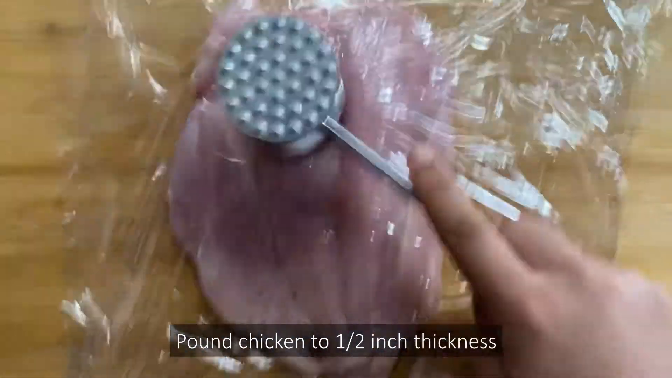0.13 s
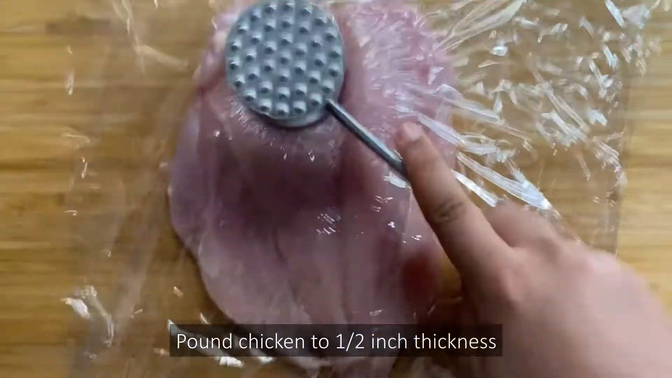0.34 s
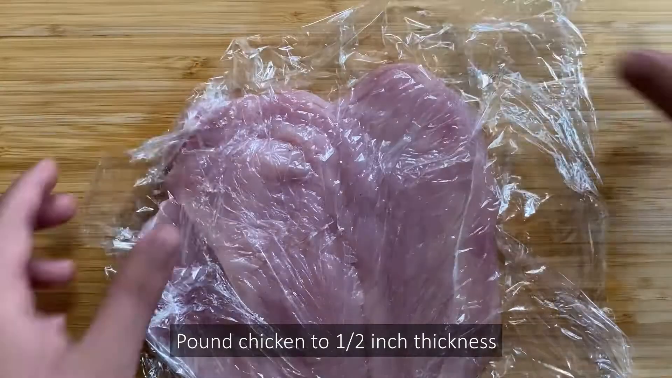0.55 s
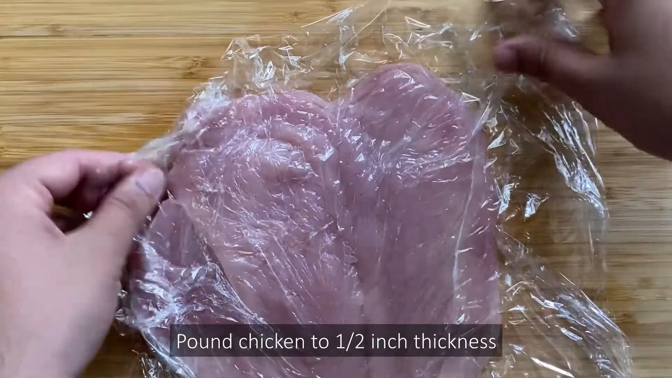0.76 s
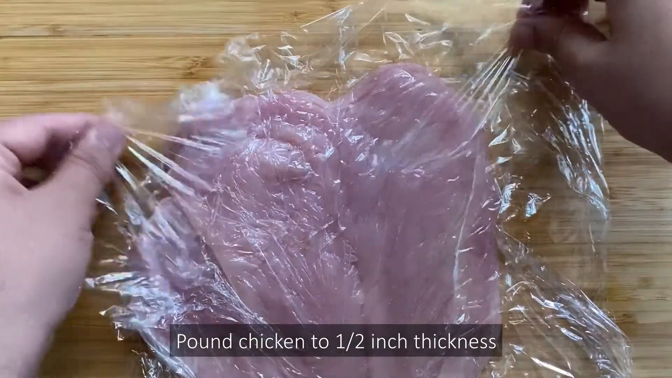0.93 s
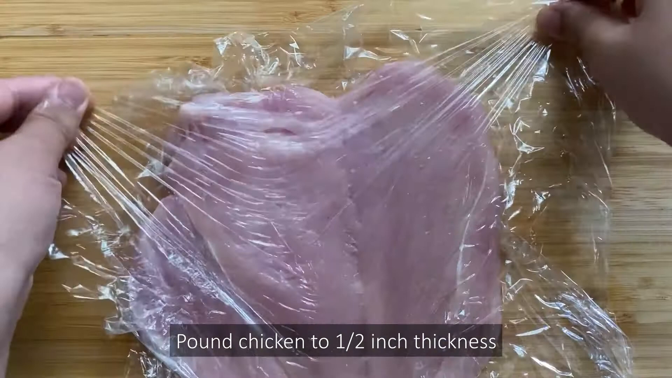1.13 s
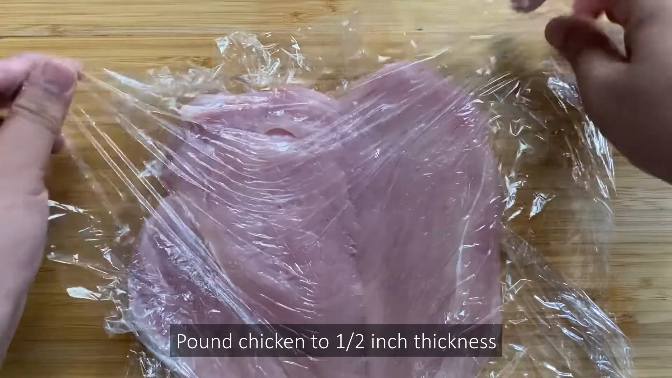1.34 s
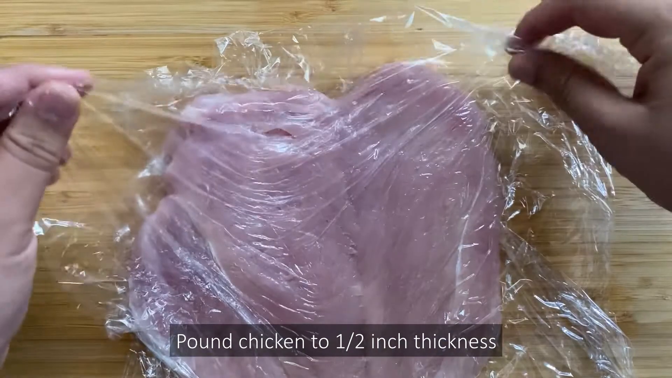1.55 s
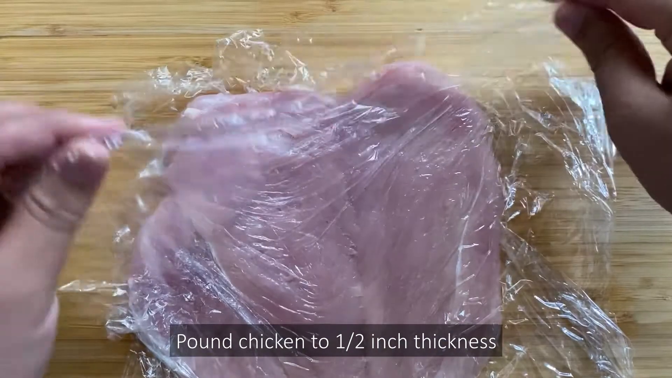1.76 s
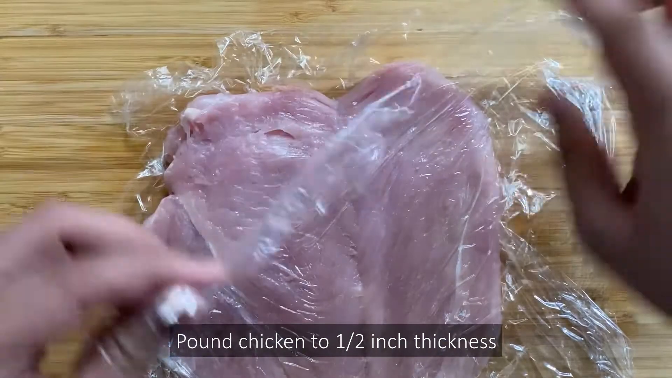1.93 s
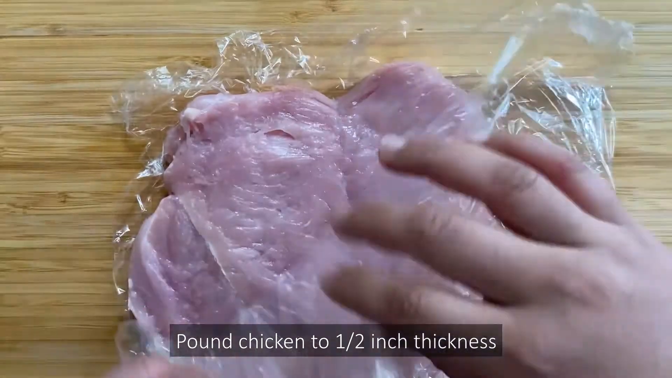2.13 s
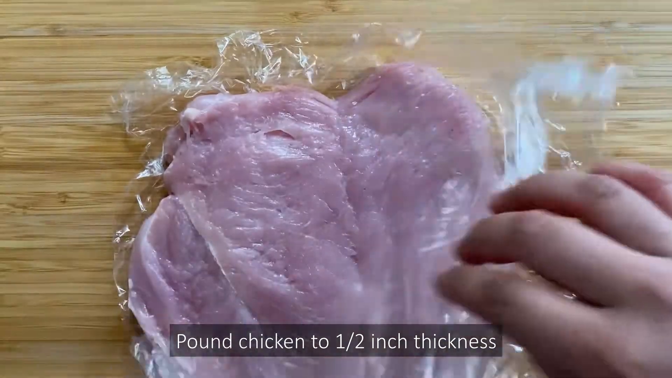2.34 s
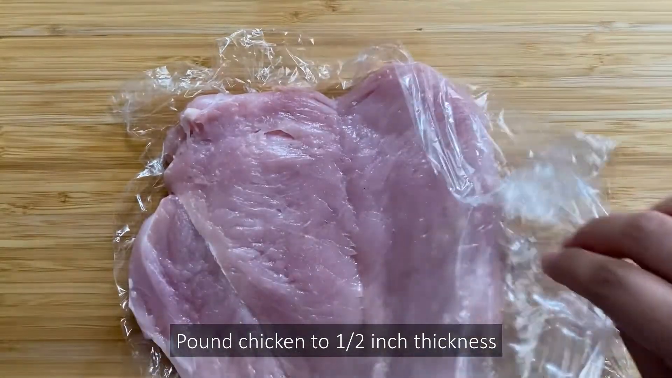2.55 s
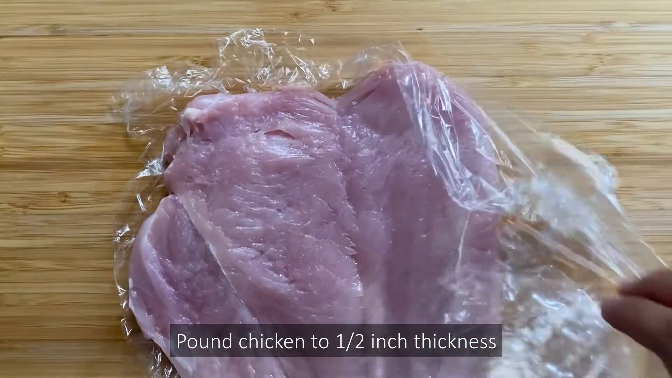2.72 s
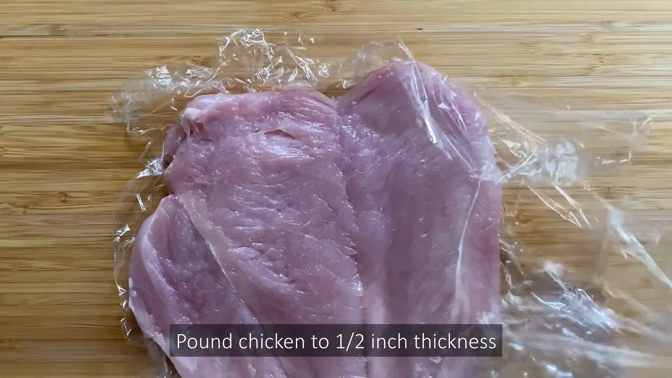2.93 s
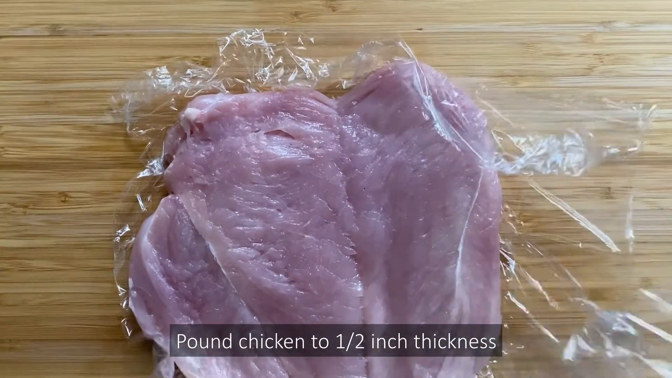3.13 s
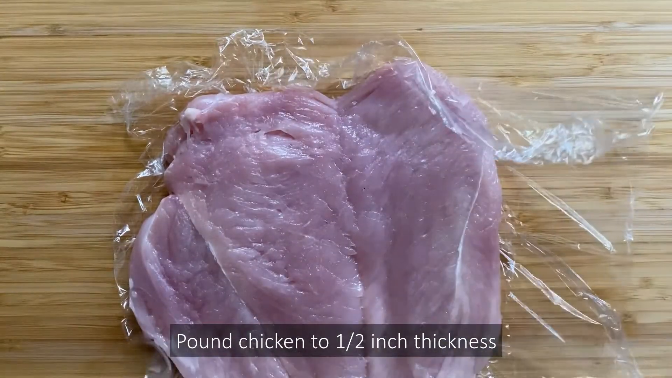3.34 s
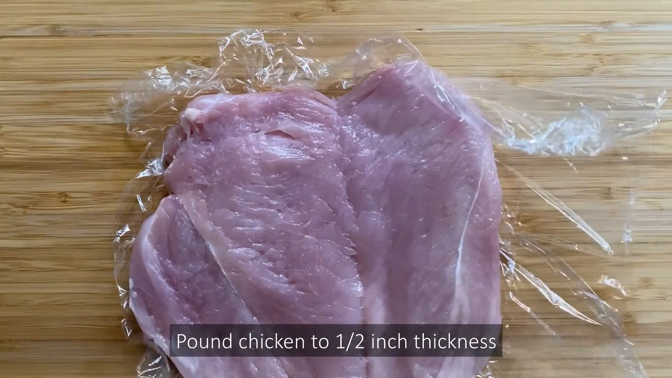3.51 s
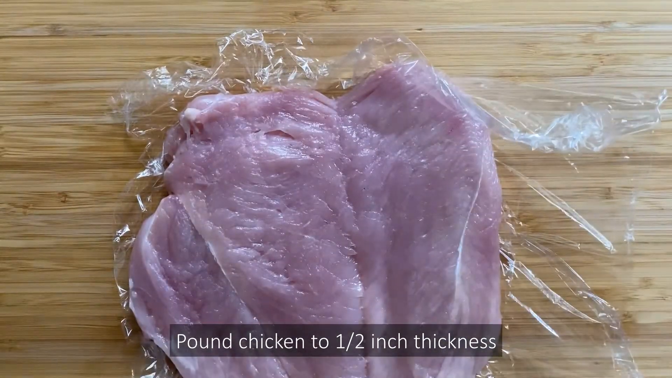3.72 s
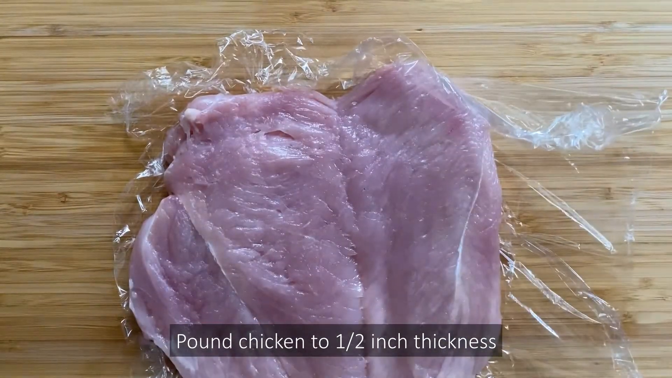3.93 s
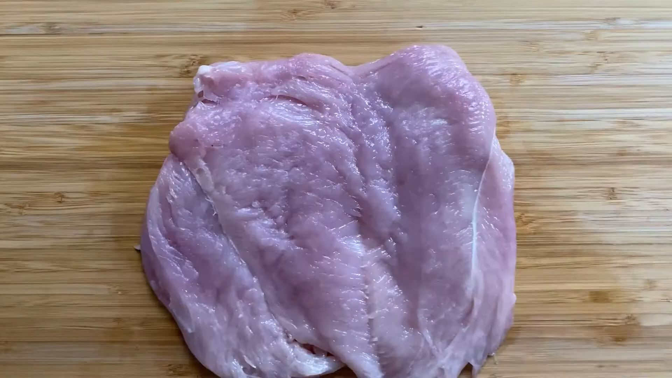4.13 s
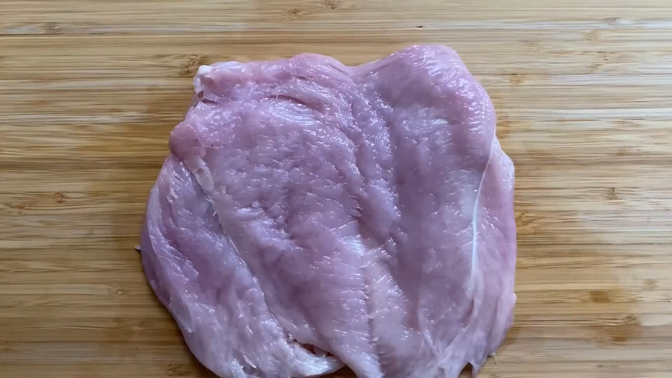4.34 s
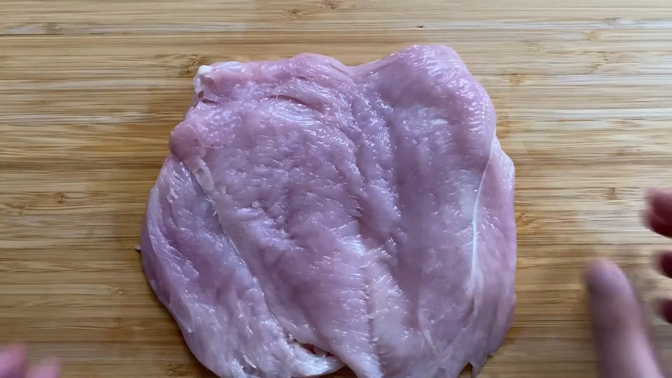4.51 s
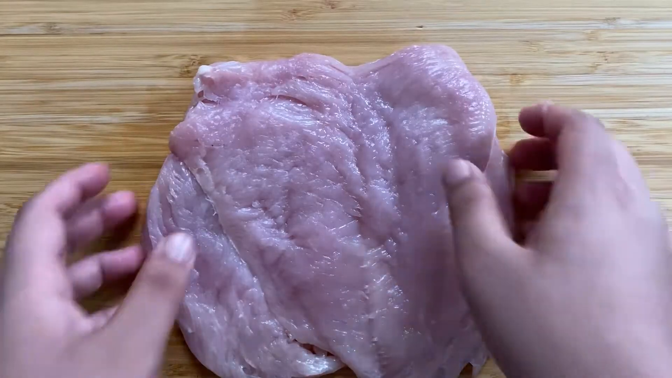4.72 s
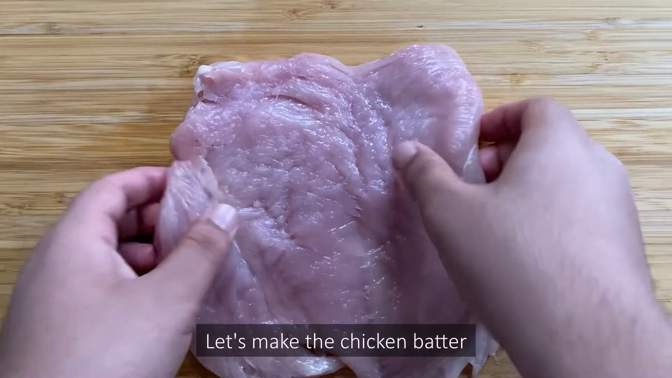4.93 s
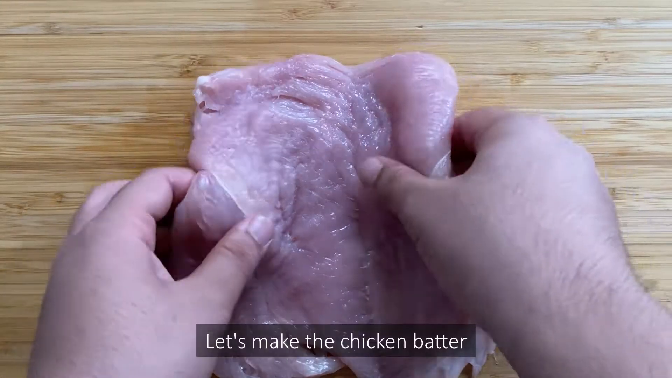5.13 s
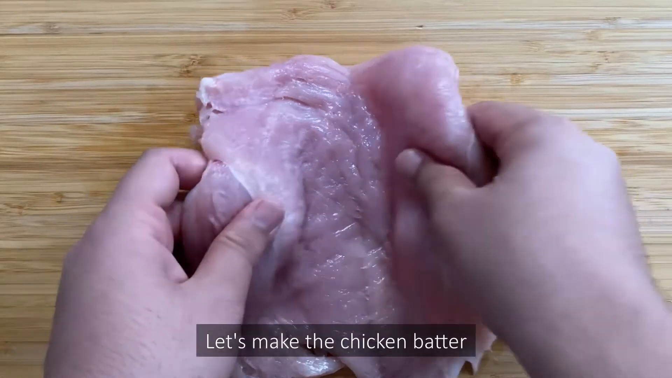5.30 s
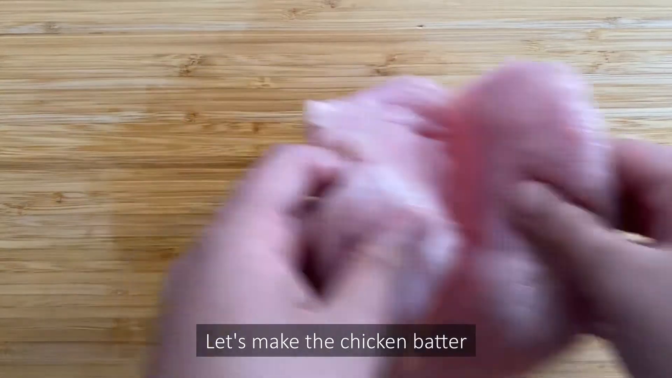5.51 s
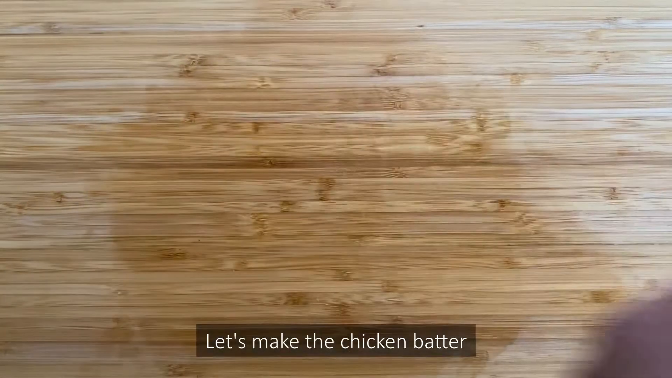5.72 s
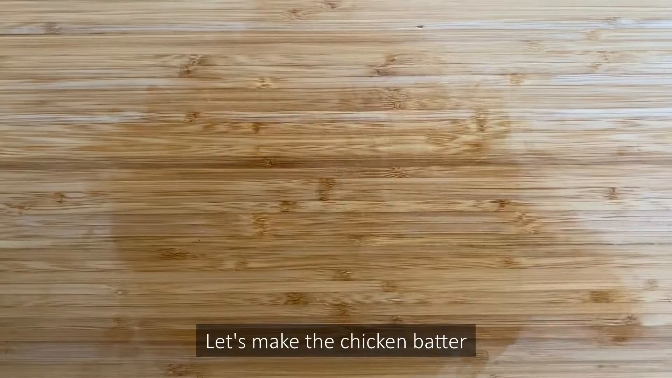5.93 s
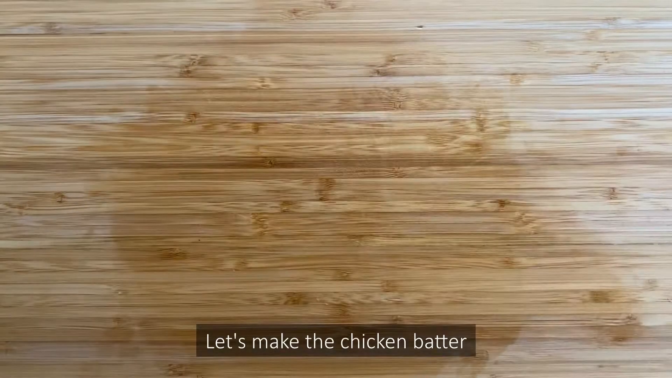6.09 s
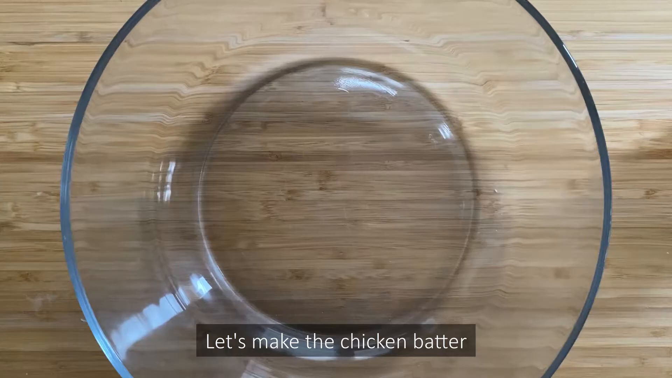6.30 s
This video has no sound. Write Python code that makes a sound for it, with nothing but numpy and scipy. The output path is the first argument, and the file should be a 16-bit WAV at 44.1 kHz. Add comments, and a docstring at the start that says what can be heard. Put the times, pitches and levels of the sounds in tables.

```python
"""Pounding a chicken breast under film

A metal mallet pounds meat under cling film on a wooden board in a kitchen: noisy cracks, damped pops, deep thumps.
Then the film peels off in swarms of random snaps, and hands grip and lift the wet meat with sparse resonant ticks.
The stages follow abruptly, over filtered noise for air and rumble and sines for a hum; a deeper room tone ends it.
"""
import sys
import numpy as np
from scipy import signal
from scipy.fft import rfft, irfft, next_fast_len
from scipy.io import wavfile
from scipy.ndimage import uniform_filter1d

SR = 44100
rng = np.random.default_rng(int(sys.argv[2]) if len(sys.argv) > 2 else 0)


def store_wav(level_fs):
    """Save 16-bit WAV to argv[1]."""
    pcm = np.round(np.clip(np.atleast_2d(level_fs), -1, 1) * 32767)
    wavfile.write(sys.argv[1], SR, pcm.T.astype(np.int16))


N = 284885
TIME = np.arange(N) / SR

POUND_END, PEEL_END, LIFT_END = 0.436, 4.062, 6.269  # abrupt ends of the stages of work [s]
AIR_DB = -72  # level of the room air [dB rms]


def mallet():
    """Impact: each blow superposes a broadband crack, a pop of trapped air and a deep thump."""
    # mallet blows, the first already dying away:
    # (time [s], crack gain [dB], air pop gain [dB], thump gain [dB])
    blows = [(-0.135, -12.5, -19.5, -8.5), (0.1214, -9.5, -32, -6), (0.3771, -6, -3.5, -2.5)]
    out = np.zeros(N)
    t = np.arange(-SR // 100, SR) / SR  # contact at t = 0
    for s, crack_db, pop_db, thump_db in blows:
        blow = from_db(crack_db) * crack(t)
        blow += from_db(pop_db) * air_pop(t)
        blow += from_db(thump_db) * thump(t)
        add(out, s + t[0], blow)
    return out + cling()


def crack(t, touch_s=.0014, fade_s=0.0029, slap_s=.00025, studs_db=-9.0, room_db=9.5):
    """Broadband impact: studs touch as short noise, the face slaps the film, the room answers in the same colour."""
    # spectrum of the studs on the film: (frequency [Hz], relative density [dB per Hz])
    crack_colour = [(120, -0.5), (400, 3.5), (680, -2.5), (2100, -6.5), (2800, -5), (5800, -3), (9500, -2),
                    (16000, -5)]
    studs = from_db(studs_db) * (t > -touch_s) * np.exp(-np.maximum(t, 0) / fade_s)
    slap = np.exp(-(t / slap_s) ** 2)
    grit = colour(rng.choice([-1., 1.], len(t)), crack_colour)
    answer = np.pad(echoes(), (len(t) - SR, 0))  # begins at contact
    tail = colour(answer, crack_colour) / np.sqrt(len(t))  # unit energy
    return grit * (studs + slap) + from_db(room_db) * tail


def air_pop(t):
    """Cavity resonance: air squeezed from under the mallet head rings in heavily damped modes."""
    # modes of the squeezed air: (frequency [Hz], gain [dB], decay by 60 dB [s])
    air_modes = [(460, -14.5, .012), (930, -24.5, 0.033), (1340, -8.5, .016), (1526, -2, 0.01),
                 (1940, -12, 0.01)]
    pop = sum(from_db(db) * ring(t, hz, t60) for hz, db, t60 in air_modes)
    return kitchen(pop, wet_db=-9.0)


def thump(t, soft_hz=42, firm_hz=78, firming_s=0.011, swell_s=.0165, flesh_db=-21.0, flesh_hz=(115, 225)):
    """Stiffening spring: cushioning meat slows the push, rises in pitch as it firms, and excites counter modes."""
    # modes of board and counter: (frequency [Hz], gain [dB], decay by 60 dB [s])
    counter_modes = [(26.95, -17.5, 0.71), (62, -27, 0.36), (84, -19, .3), (125.2, -20.5, 0.48),
                     (162, -20.5, .2), (209, -25, 0.24), (321, -31.5, .25), (400, -32, .3)]
    t = np.maximum(t, 0)
    hz = firm_hz + (soft_hz - firm_hz) * np.exp(-t / firming_s)
    swell = t / swell_s * np.exp(1 - t / swell_s)  # peaks at 1 after swell_s
    phase = 2 * np.pi * np.cumsum(hz * (t > 0)) / SR
    push = np.sin(phase) * swell ** 3.0
    flesh_noise = rms_one(band(rng.standard_normal(len(t)), flesh_hz, order=3))
    flesh = from_db(flesh_db) * swell * flesh_noise
    counter = sum(from_db(db) * ring(t - swell_s, mode_hz, t60) for mode_hz, db, t60 in counter_modes)
    return push + counter + kitchen(flesh, wet_db=-8.5)


def cling(start_db=-47, fade_db_per_s=119.5):
    """Adhesive release: film clinging to the rising mallet lets go in random snaps that decay exponentially."""
    # spectrum of the clinging film: (frequency [Hz], relative density [dB per Hz])
    cling_colour = [(900, -11), (1700, -4.5), (3200, -7.5), (6000, 0), (8500, -11.5), (11000, -20)]
    letting_go = colour(crackle(per_s=9000, spread_db=2.5), cling_colour)
    return from_db(start_db - fade_db_per_s * TIME) * letting_go


def film(full_db=-49.5, full_per_s=4500, surge_db=1.0, surges_per_s=40):
    """Crackling noise: harder pulling releases more creases a second, in surges, with stiff creases ticking."""
    # spectrum of the peeled film: (frequency [Hz], relative density [dB per Hz])
    film_colour = [(150, -6.5), (400, -4.5), (700, -7), (1500, -6), (3200, -3.5), (5200, 1), (7500, 3),
                   (10600, -1), (15500, -1)]
    fine_db, coarse_db = film_effort()
    # full_per_s creases a second when the fine crackle is at full_db
    creases_per_s = full_per_s * from_db(.7 * (np.maximum(fine_db, AIR_DB) - full_db))
    creases = rms_one(crackle(creases_per_s, spread_db=5.0))
    stiff = from_db(-9.5) * lone_ticks(per_s=80) + from_db(-6) * pitched_ticks(per_s=400)
    surges = from_db(surge_db * drift(surges_per_s))
    rustle = colour(kitchen(surges * (creases + stiff), wet_db=-12), film_colour)
    return two_sizes(rustle, fine_db, coarse_db, split_hz=3180)


def film_effort(touch_s=.66, slack_fine_db=-65, slack_coarse_db=-71):
    """Driving force: slack rustle from the first touch, short tugs and one long pull set both crackle levels."""
    # short tugs that pinch and stretch the film:
    # (time [s], length [s], fine crackle gain [dB], crumpling gain [dB])
    tugs = [(0.784, 0.088, -52, -55), (0.946, 0.059, -46, -52.5), (1.098, 0.062, -53, -59.5),
            (1.277, 0.19, -63.5, -67.5), (1.707, 0.072, -59, -65), (3.853, 0.15, -62, -70)]
    # the long pull that strips the film off: (time [s], fine crackle gain [dB], crumpling gain [dB])
    pull = [(1.85, -63.5, -67), (1.884, -53.5, -63.5), (2.066, -50, -58), (2.464, -47, -54.5),
            (2.67, -51.5, -57.5), (2.872, -48.5, -54), (3.114, -45.5, -51.5), (3.528, -51, -56.5),
            (3.66, -64.5, -69.5)]
    pulling = movement(pull[0][0], pull[-1][0] - pull[0][0])
    touched = between(touch_s, PEEL_END)
    pull_fine_db, pull_coarse_db = in_time(pull)
    fine = np.maximum(from_db(pull_fine_db) * pulling, from_db(slack_fine_db) * touched)
    coarse = np.maximum(from_db(pull_coarse_db) * pulling, from_db(slack_coarse_db) * touched)
    fine_db = effort_db([(s, length, db) for s, length, db, _ in tugs], fine)
    coarse_db = effort_db([(s, length, db) for s, length, _, db in tugs], coarse)
    return fine_db, coarse_db


def two_sizes(x, fine_db, coarse_db, split_hz):
    """Size and pitch: small folds sound above the split, large ones below, each following its own effort."""
    fine = band(x, split_hz, "high", order=3)
    coarse = band(x, split_hz, "low", order=3)
    return from_db(fine_db) * rms_one(fine) + from_db(coarse_db) * rms_one(coarse)


def snaps(cycles=5.6, edge_db=-6.0):
    """Sudden release: a snapping crease or wet thread gives a sharp edge and a few cycles of ringing."""
    # the loudest snaps of creases and wet threads: (time [s], peak of the direct sound [dB], pitch [Hz])
    snap_events = [(0.6624, -35.5, 5890), (0.6659, -36, 6360), (0.7158, -37.5, 8300), (1.3612, -38.5, 4110),
                   (1.4731, -44.5, 8720), (1.6888, -35.5, 8300), (2.2137, -24.5, 6400), (2.2742, -30, 7340),
                   (2.9822, -31, 7310), (3.092, -24.5, 4320), (5.1587, -39, 12900), (5.3238, -36.5, 8300),
                   (5.3702, -37.5, 7540), (5.3776, -27, 13200), (5.4246, -39, 5200), (5.4544, -33, 7140),
                   (5.4739, -29.5, 7450)]
    out, t = np.zeros(N), np.arange(SR // 100) / SR
    for s, db, hz in snap_events:
        tick = ring(t, hz, cycles / hz) - from_db(edge_db) * (t == 0)
        add(out, s, from_db(db) * tick / np.abs(tick).max())
    return kitchen(out, wet_db=-8.0)


def rubs(slips_per_s=1400, uneven_db=2.5, width=1.426, rise_share=0.18, body_ratio=0.36, body_db=-6.5, edge_db=-11):
    """Stick-slip friction: uneven slips swarm around one pitch, with a duller body and a faint bright edge."""
    # fingers rubbing film and squelching on the meat: (time [s], gain [dB], pitch [Hz], length [s])
    rub_events = [(0.555, -71, 3070, 0.067), (0.713, -52, 3020, 0.0065), (0.777, -54, 2760, 0.071),
                  (2.35, -56, 2600, 0.03), (3.275, -53, 4200, 0.022), (3.906, -69, 2330, .085),
                  (4.367, -76, 3300, 0.12), (4.645, -62, 1070, 0.069), (4.718, -65.5, 1530, 0.13),
                  (4.728, -64.5, 700, 0.077), (4.941, -60.5, 2300, 0.084), (5.231, -67, 2080, 0.099),
                  (5.362, -62.5, 1270, 0.028), (5.426, -59.5, 4400, 0.06), (5.684, -63.5, 730, 0.038)]
    out, t = np.zeros(N), np.arange(SR // 2) / SR
    spread = max(width, 1.05) ** np.array([-1, 1])  # band edges relative to the pitch
    parts = (1, 0), (body_ratio, body_db), (2, edge_db)  # (pitch ratio, gain [dB])
    for s, db, hz, length in rub_events:
        uneven = np.clip(rng.standard_normal(len(t)), -2, 2)
        sizes = from_db(uneven_db * uneven) * rng.standard_normal(len(t))
        slips = sizes * (rng.random(len(t)) < slips_per_s / SR)
        swarm = sum(from_db(part_db) * rms_one(band(slips, ratio * hz * spread)) for ratio, part_db in parts)
        age = t / (rise_share * length)
        add(out, s, from_db(db) * np.sqrt(age * np.exp(1 - age)) * swarm)
    return kitchen(out, wet_db=-4.0)


def meat(wet_per_s=600, thread_db=-4, threads_per_s=100):
    """Wet adhesion: gripped and lifted flesh unsticks in sparse ticks; a soft hiss goes with the moving hands."""
    # spectra of the wet ticks and of the soft hiss: (frequency [Hz], relative density [dB per Hz])
    meat_colour, hiss_colour = [(400, 1), (1700, -0.5), (5500, 0), (8000, 1), (11000, -4), (16000, 4.5)], [(400, -4.5), (2000, -3.5), (5000, -3), (8000, -1),
                                                     (11000, -8.5), (16000, -8)]
    # fingers work under the meat, then it comes off the board: (time [s], length [s], wet crackle gain [dB])
    grips = [(4.97, 0.53, -67), (5.44, 0.042, -61)]
    # hiss while the hands move about: (time [s], length [s], gain [dB])
    swishes = [(4.16, 0.8, -81), (4.5, 0.033, -76), (4.88, 1.156, -73.5)]
    unsticking = pitched_ticks(wet_per_s) + from_db(thread_db) * lone_ticks(threads_per_s)
    ticks = colour(kitchen(unsticking, wet_db=-12.5), meat_colour)
    hiss = colour(rng.standard_normal(N), hiss_colour)
    return from_db(effort_db(grips)) * ticks + from_db(effort_db(swishes)) * hiss


def bumps(touch_s=0.0049, t60=0.2, overtone=1.55, overtone_db=-5):
    """Soft contact: bumps of hands and meat swell for a moment and ring dully, with one overtone."""
    # soft bumps: (time [s], gain [dB], pitch [Hz])
    bump_events = [(1.204, -54.5, 134.6), (4.65, -47.5, 122), (4.686, -53, 182.3), (4.732, -49, 89),
                   (4.967, -53.5, 172), (5.172, -43.5, 86)]
    out, t = np.zeros(N), np.arange(SR // 2) / SR
    for s, db, hz in bump_events:
        body = ring(t, hz, t60) + from_db(overtone_db) * ring(t, overtone * hz, t60)
        add(out, s, from_db(db) * body * (1 - np.exp(-t / touch_s)))
    return kitchen(out, wet_db=-4.5)


def background(drone_db=-56.5):
    """Noise and sines: steady air and hum, a low rumble that swells and sinks, then only a deeper room tone."""
    # level of the low rumble at the counter: (time [s], level [dB rms])
    rumble_level = [(.5, -59.5), (.7, -62.5), (1.15, -57), (1.6, -66.5), (3.2, -58.5), (4.2, -76.5),
                    (4.8, -67), (5.25, -56), (5.8, -73.5)]
    # spectra of rumble, room air and final room tone: (frequency [Hz], relative density [dB per Hz])
    rumble_colour, air_colour, drone_colour = [(27, 1.5), (50, -9), (105, -9.5), (200, -21), (400, -51.5)], [(120, -1.5), (400, -4.5), (600, -10),
                                                                      (1320, -16.5), (7000, -26),
                                                                      (16000, -38.5)], [(30, -8.5), (70, 2),
                                                                                   (120, -18), (330, -11.5),
                                                                                   (620, -22.5),
                                                                                   (1000, -27), (2500, -40),
                                                                                   (16000, -60)]
    # appliance hum: (frequency [Hz], level [dB rms])
    hum_tones = [(80.7, -79), (161.5, -77), (247.6, -82), (403.7, -83)]
    rumble_db, = in_time(rumble_level)
    air = from_db(AIR_DB) * colour(rng.standard_normal(N), air_colour)
    rumble = from_db(rumble_db) * colour(rng.standard_normal(N), rumble_colour)
    hum = np.zeros(N)
    for hz, db in hum_tones:
        hum += from_db(db) * np.sqrt(2) * np.sin(2 * np.pi * (hz * TIME + rng.random()))
    drone = from_db(drone_db) * colour(rng.standard_normal(N), drone_colour)
    working = between(0, LIFT_END)
    return (air + rumble + hum) * working + drone * (1 - working)


def kitchen(x, wet_db):
    """Reverberation as convolution: direct sound plus the room's answer."""
    return x + from_db(wet_db) * signal.fftconvolve(x, echoes())[:len(x)]


def echoes(early_db=4.5, early_s=0.013):
    """Room impulse response: one second of diffuse noise, stronger early on, decaying at its own rate by band."""
    # kitchen reverberation: (frequency [Hz], decay by 60 dB [s])
    reverberation = [(100, 0.27), (500, 0.79), (2000, .42), (8000, 0.44), (16000, 0.13)]
    t, edges = np.arange(SR) / SR, np.geomspace(110, 18000, 10)
    tail = np.zeros(SR)
    for lo, hi in zip(edges, edges[1:]):
        t60 = at_hz(reverberation, np.sqrt(lo * hi))
        tail += band(rng.standard_normal(SR), [lo, hi]) * from_db(-60 * t / t60)
    early = 1 + from_db(early_db) * np.exp(-t / early_s)  # quick reflections off counter and wall
    tail *= early * (t > .002)
    return tail / np.linalg.norm(tail)


def crackle(per_s, spread_db, clump_db=0.72, clumps_per_s=70):
    """Random impulses: uneven tiny snaps fall separately in each band, in clumps partly shared by all bands."""
    out, together, edges = 0, drift(clumps_per_s), np.geomspace(150, 19000, 8)
    for lo, hi in zip(edges, edges[1:]):
        uneven = np.clip(rng.standard_normal(N), -2.5, 2.5)
        sizes = from_db(spread_db * uneven) * rng.choice([-1, 1], N)
        clumps = from_db(clump_db * (together + drift(clumps_per_s / 2)))
        snapping = rng.random(N) < per_s / SR
        out = out + band(clumps * sizes * snapping, [lo, hi], order=1)
    return out / np.sqrt(np.minimum(per_s, SR))  # power independent of the rate


def lone_ticks(per_s):
    """Impulses are broadband: sparse, sharp ticks cover all pitches at once; rms 1."""
    sizes = from_db(3 * np.clip(rng.standard_normal(N), -2, 2)) * rng.choice([-1, 1], N)
    return rms_one(sizes * (rng.random(N) < per_s / SR))


def pitched_ticks(per_s, lowest_hz=1300, cycles=12.5):
    """Impulse-excited resonance: tiny folds or wet cavities ring a few cycles at one of many pitches; rms 1."""
    out, t = 0, np.arange(SR // 100) / SR
    pitches = np.geomspace(lowest_hz, 15000, 16)
    for hz in pitches:
        ticks = lone_ticks(per_s / len(pitches))
        resonance = rms_one(ring(t, hz, cycles / hz))
        out = out + signal.oaconvolve(ticks, resonance)[:N] * np.sqrt(hz)
    return rms_one(out)


def ring(t, hz, t60):
    """Damped oscillation: a struck mode, silent before t = 0."""
    t = np.maximum(t, 0)
    return np.sin(2 * np.pi * hz * t) * from_db(-60 * t / t60)


def movement(start, length, swell_db_per_s=291, settle_db_per_s=169):
    """Exponential envelope: the gain of one movement of the hands swells, holds and settles."""
    before = np.maximum(start - TIME, 0)
    after = np.maximum(TIME - start - length, 0)
    return from_db(-swell_db_per_s * before - settle_db_per_s * after)


def effort_db(moves, steady=0):
    """Addition of powers: level in dB of several movements on top of an underlying gain."""
    power = sum((from_db(db) * movement(s, length)) ** 2 for s, length, db in moves)
    return 10 * np.log10(power + steady ** 2 + 1e-18)


def drift(per_s):
    """Slow random modulation: chance values joined by straight lines; rms 1."""
    knots = rng.standard_normal(int(per_s * N / SR) + 2)
    return rms_one(np.interp(TIME * per_s, np.arange(len(knots)), knots))


def colour(x, spectrum):
    """Spectral shaping: apply a smooth spectrum that falls away outside the table; rms 1."""
    size = next_fast_len(len(x) + 4096)
    hz = np.arange(size // 2 + 1) * SR / size
    lowest, highest = spectrum[0][0], spectrum[-1][0]
    skirt = np.minimum(hz / lowest, 1) ** 2 / np.maximum(hz / highest, 1) ** 2
    shaped = rfft(x, size) * from_db(at_hz(spectrum, hz)) * skirt
    return rms_one(irfft(shaped, size)[:len(x)])


def band(x, hz, kind="band", order=2):
    """Band limitation by a Butterworth filter."""
    sos = signal.butter(order, np.clip(hz, 10, .47 * SR), kind, fs=SR, output="sos")
    return signal.sosfilt(sos, x + 1e-18)


def at_hz(points, hz):
    """Logarithmic pitch scale: read a table on a log-frequency axis."""
    f, value = np.transpose(points)
    return np.interp(np.log(np.maximum(hz, 1)), np.log(f), value)


def in_time(rows):
    """Linear interpolation: each column of a curve at every sample."""
    s, *columns = np.transpose(rows)
    return [np.interp(TIME, s, c) for c in columns]


def between(start, end):
    """Gating: 1 during a stage of work, 0 outside it, with edges smoothed over 64 samples."""
    return uniform_filter1d(((TIME >= start) & (TIME < end)) * 1., size=64)


def add(out, s, sound):
    """Superposition: mix a sound in from time s [s]."""
    start = round(s * SR)
    sound = sound[max(-start, 0):N - start]
    out[max(start, 0):max(start, 0) + len(sound)] += sound


def from_db(db):
    """Logarithmic level: decibels to amplitude gain."""
    return 10 ** (np.asarray(db) / 20)


def rms_one(x):
    """Normalisation by mean power: scale to rms 1."""
    return x / np.sqrt(np.mean(x ** 2) + 1e-20)


def scene():
    """Superposition: pounding, peeling and lifting in turn, over single contacts and the background."""
    work = mallet() * between(0, POUND_END)
    work += film() * between(POUND_END, PEEL_END)
    work += meat() * between(PEEL_END, LIFT_END)
    return (work + snaps() + rubs() + bumps() + background())[None]


def record(dry, cutoff_hz=15900):
    """Amplitude and band limits: peaks beyond full scale clip and a steep low-pass cuts the top."""
    low_pass = signal.ellip(10, .1, 70, cutoff_hz, fs=SR, output="sos")
    return signal.sosfilt(low_pass, np.clip(dry, -1, 1))


dry = scene()
out = record(dry)
store_wav(out)
```